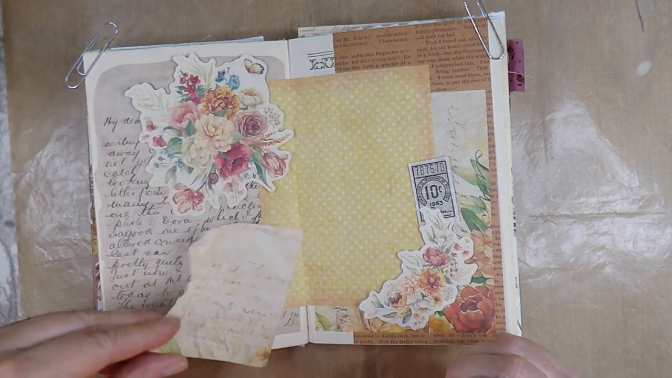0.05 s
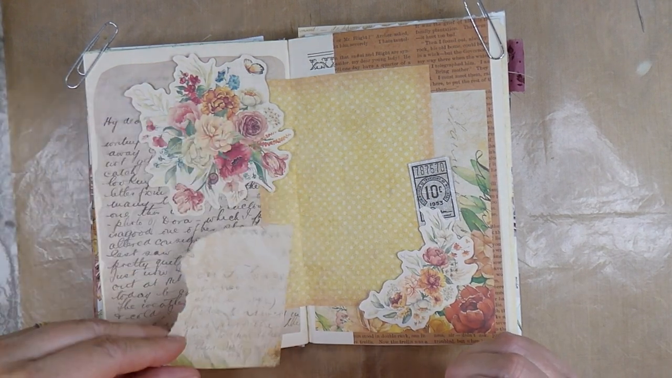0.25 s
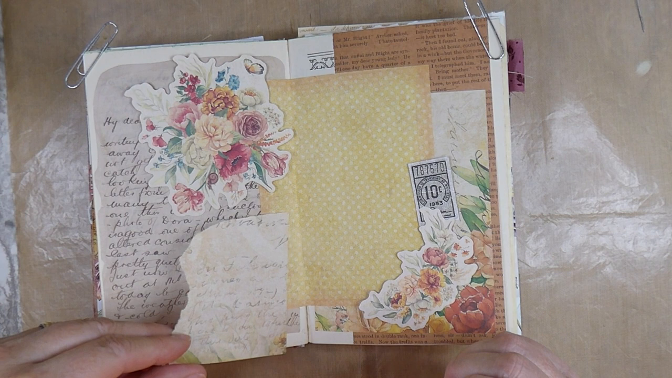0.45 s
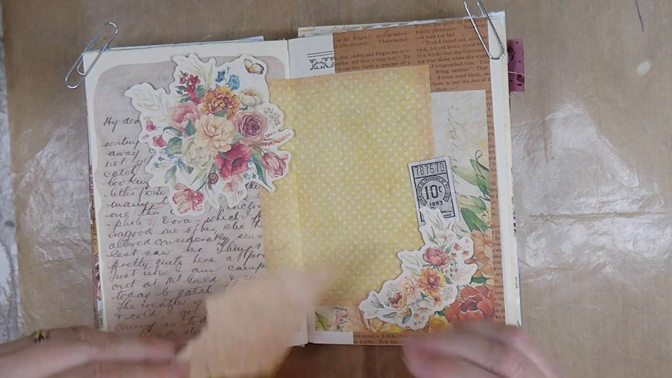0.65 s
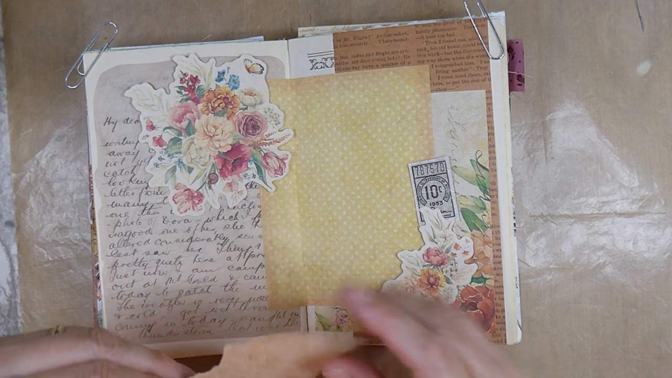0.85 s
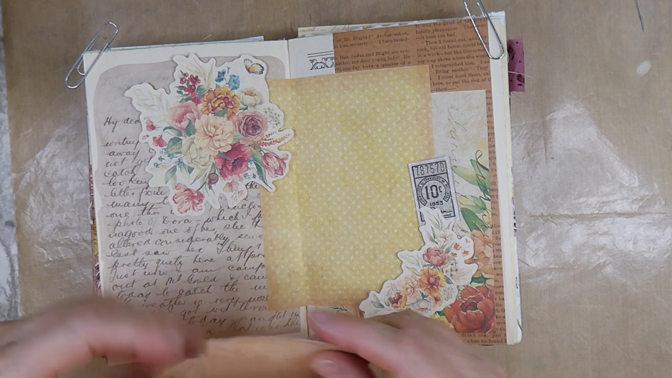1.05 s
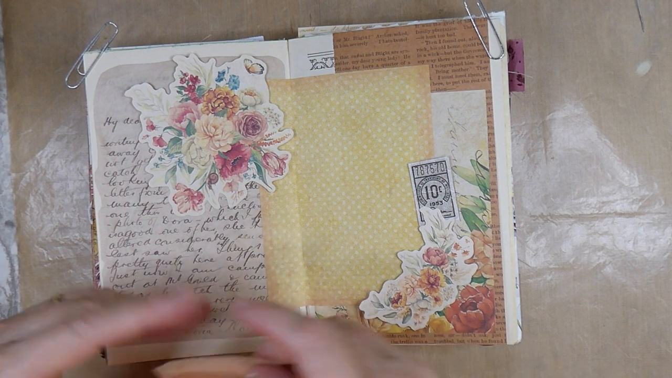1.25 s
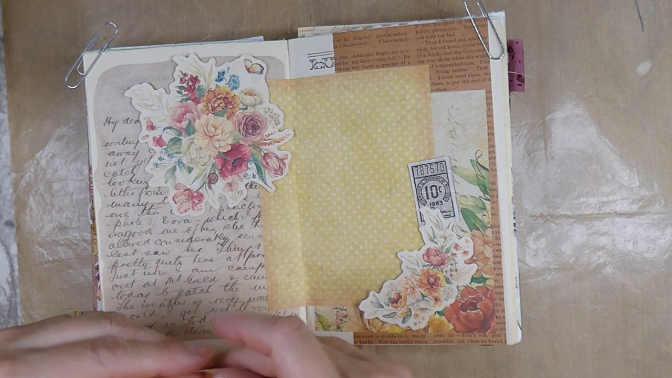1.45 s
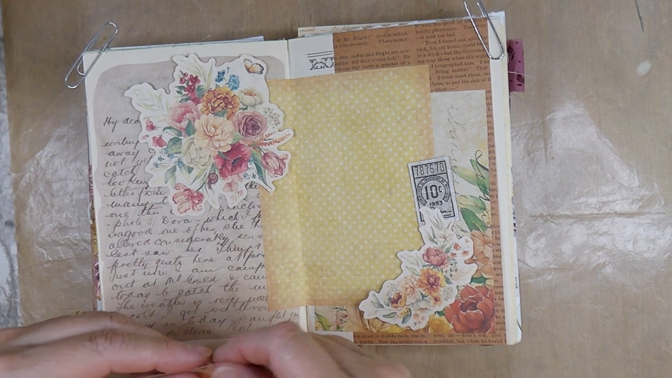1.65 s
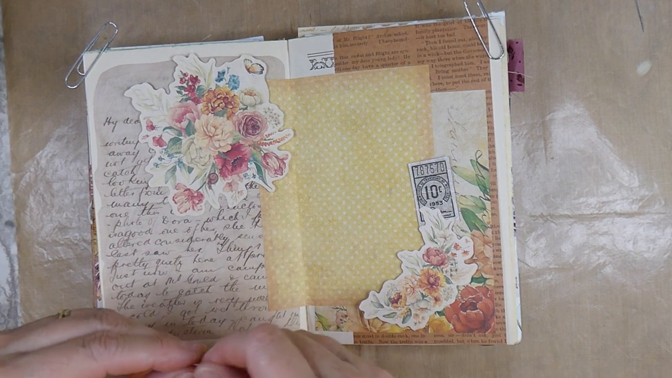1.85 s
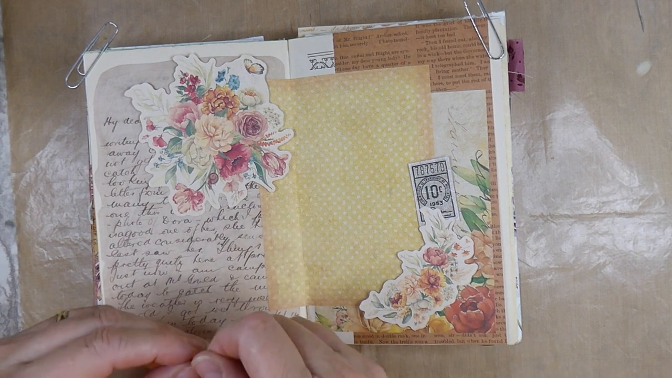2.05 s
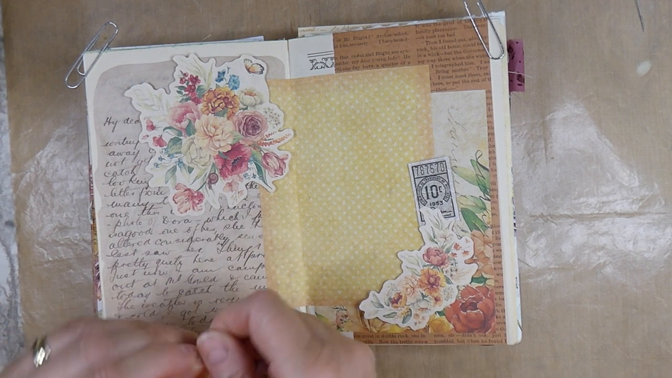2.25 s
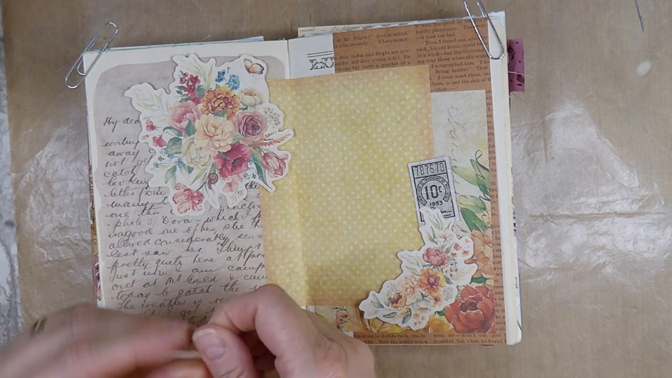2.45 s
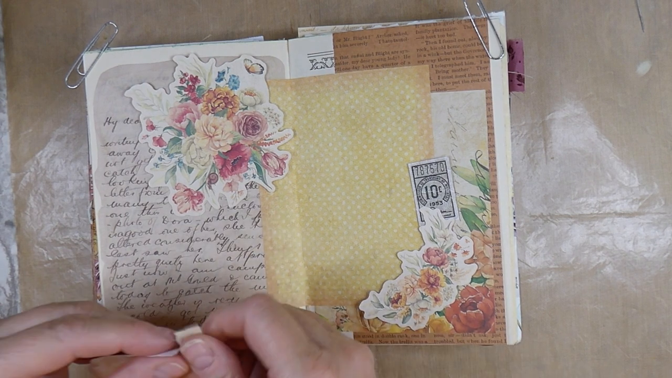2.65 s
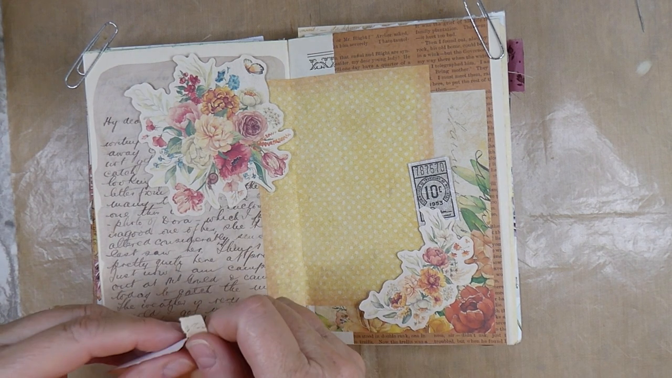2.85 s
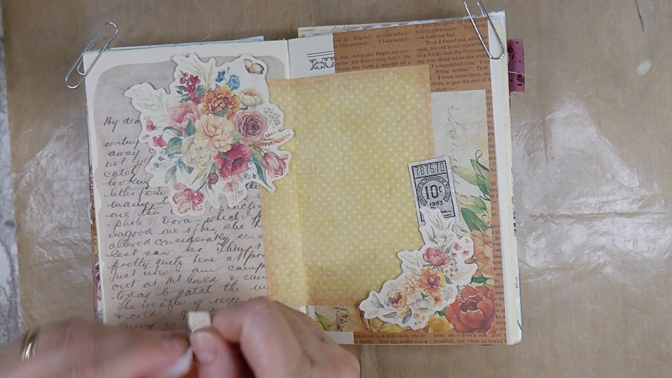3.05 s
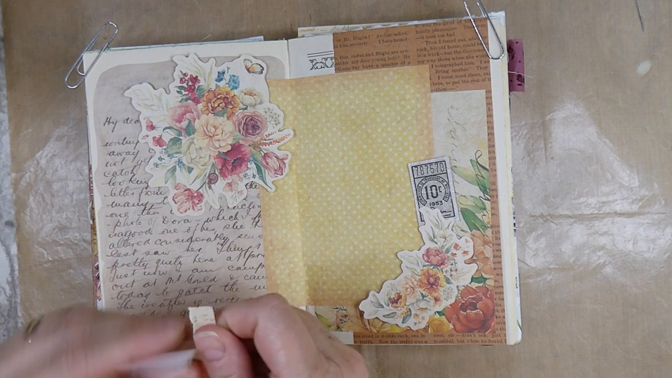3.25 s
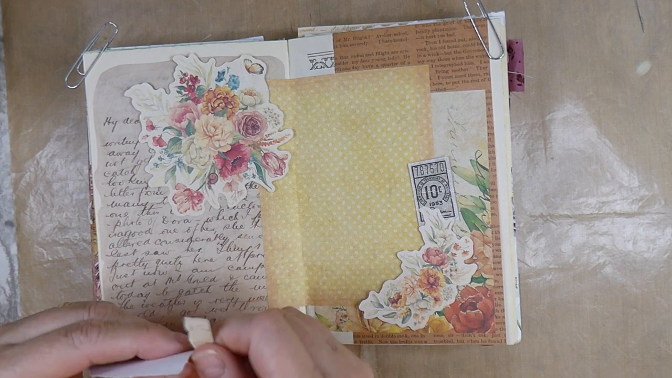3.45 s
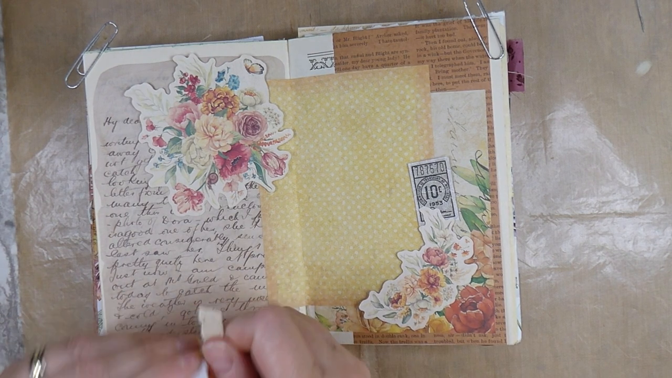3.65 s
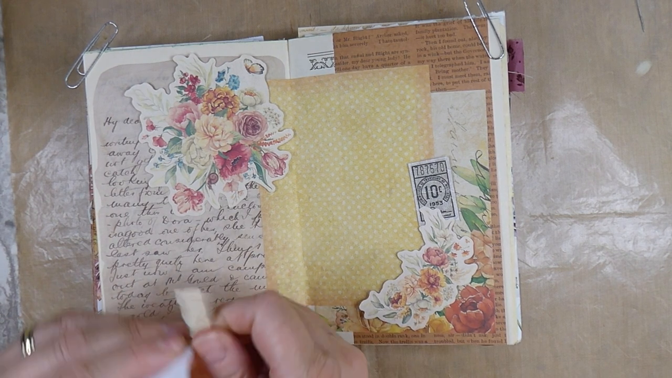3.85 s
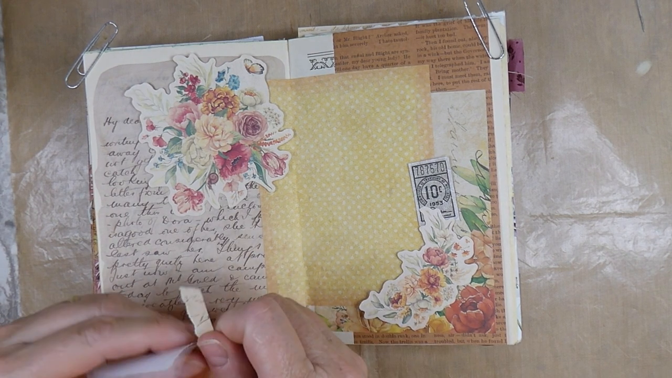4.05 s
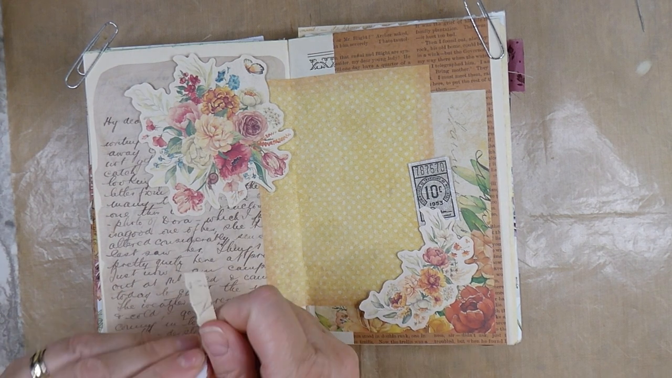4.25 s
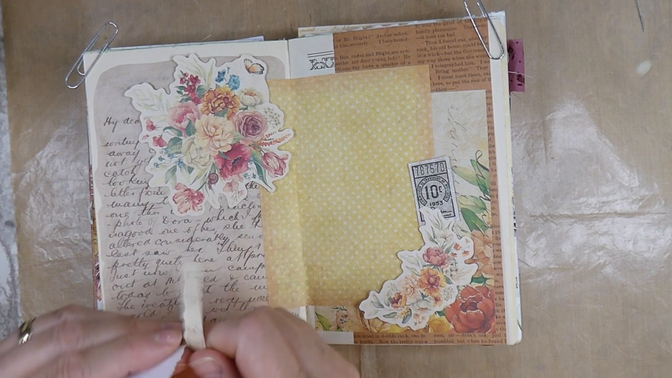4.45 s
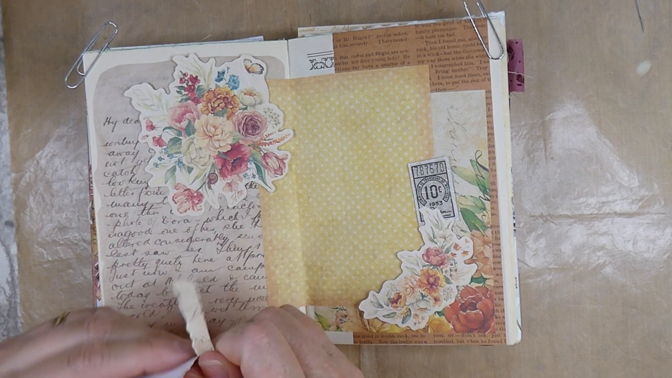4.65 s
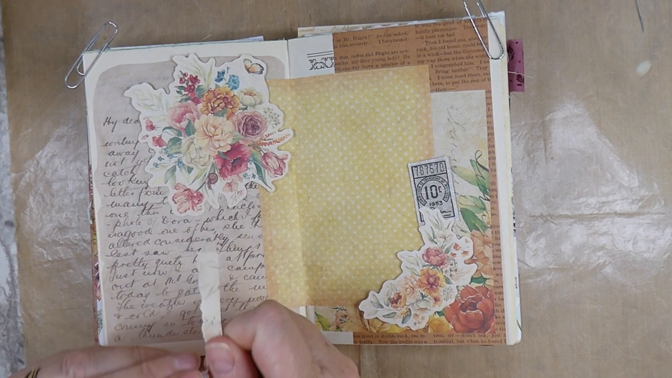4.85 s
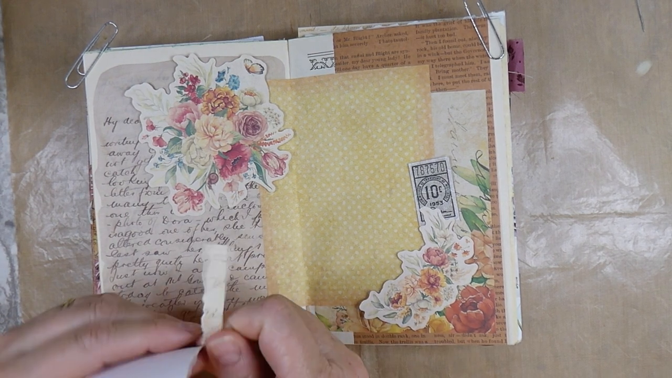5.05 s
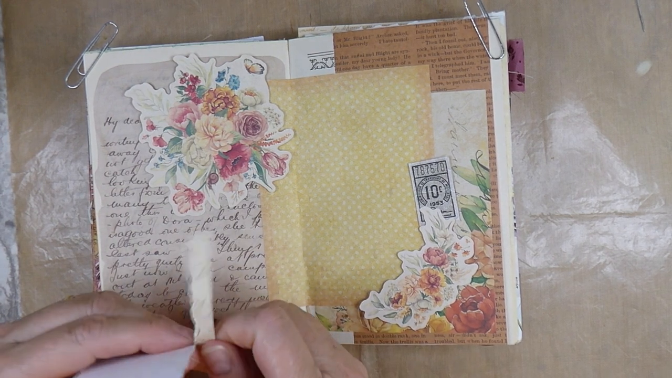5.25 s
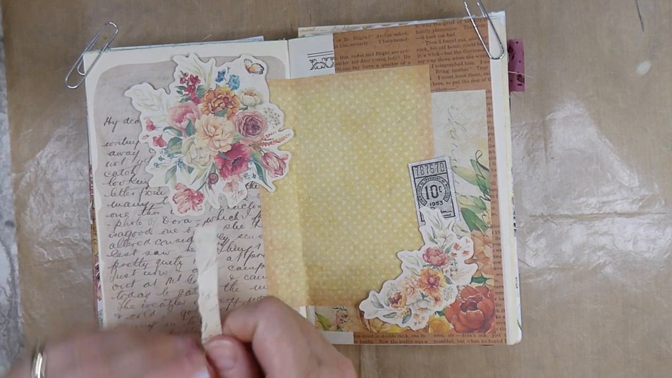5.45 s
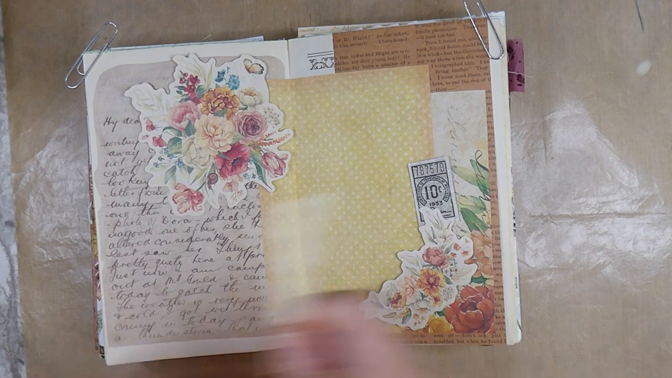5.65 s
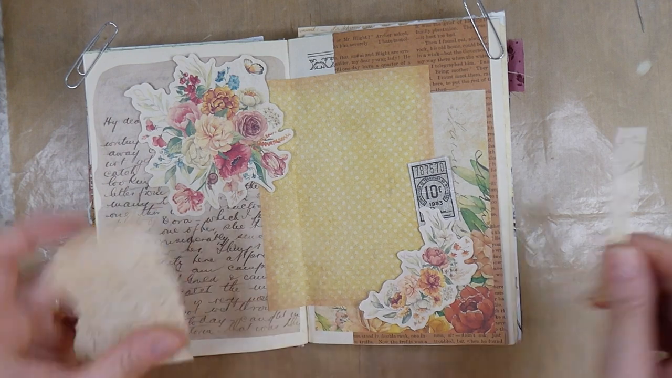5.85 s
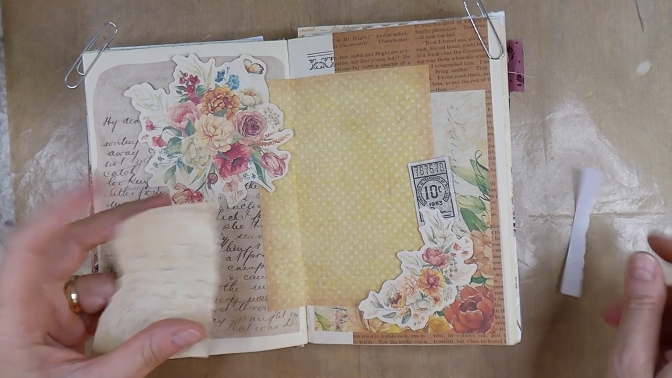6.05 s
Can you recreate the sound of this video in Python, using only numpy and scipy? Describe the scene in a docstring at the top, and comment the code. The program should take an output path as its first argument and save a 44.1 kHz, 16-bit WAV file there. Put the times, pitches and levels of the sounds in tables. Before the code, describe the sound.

Fingertips rustle a scrap of thin paper, then tear off a strip in short, crackling pulls in a quiet room.

```python
"""Fingertips rustle and slide on a scrap of thin paper; then a strip is torn off it in short pulls.
Breaking fibres crackle in showers of tiny bursts, sliding skin hisses, and both ring in the bending sheet.
Creases snap with a crack and a knock; a hand or the cupped sheet bumps softly.
The craft table and the walls return a short dull echo, and a quiet room hums below."""
import sys
import numpy as np
from scipy import signal
from scipy.fft import rfft, irfft
from scipy.io import wavfile
from scipy.ndimage import uniform_filter1d

SR = 44100
rng = np.random.default_rng(int(sys.argv[2]) if len(sys.argv) > 2 else 0)


def digitize_waveform(pressure):
    """Quantize a signal to 16-bit integers and store it at the path in sys.argv[1].

    Rows of a 2-D input are taken as channels; values are limited to [-1, 1].
    """
    field = np.atleast_2d(pressure).T
    bounded = np.clip(field, -1, 1)
    quanta = np.round(bounded * 32767).astype(np.int16)
    wavfile.write(sys.argv[1], SR, quanta)


N = 269892

# Hiss, flutter, boom: high, middle, low band of the sheet. Top: treble above TOP_HZ.
# Tearing pulls: (start [s], length [s], start hiss [dB], end hiss [dB], midway swell [dB],
# flutter [dB re hiss], start ring [Hz], end ring [Hz], boom [dB re hiss], torn share [0-1], top gain [dB])
PULLS = [(2.213, 0.11, -45, -59, 0.5, -4, 4600, 4720, -17.5, 1, -13),
         (2.324, 0.061, -49.5, -54, 6.5, -9.5, 4500, 4530, -20.5, 0.34, -7),
         (3.002, 0.17, -46.5, -55, 7.5, -3.5, 3470, 3930, -13.5, 0.52, 2.5),
         (3.66, 0.11, -42, -56, 2.5, -3.5, 4330, 4600, -16, 0.62, 2.5),
         (4.16, 0.13, -44.5, -54.5, 2, 0, 4600, 5200, -14.5, 0.58, 4),
         (4.741, 0.067, -39.5, -50, 4, -2.5, 4930, 5030, -13.5, 0.5, 5.5),
         (4.807, 0.068, -43.5, -42.5, 1, -3.5, 5400, 5480, -19.5, 0.57, -1.5),
         (5.417, 0.076, -46.5, -41, 0, -2, 4040, 4200, -15, 0.8, -18),
         (5.456, 0.12, -43.5, -35.5, 5.5, -3.5, 4330, 6200, -23, 0.48, -3.5),
         (5.571, 0.05, -38.5, -30.5, 0, -2, 3700, 4630, -16.5, 0.42, 6)]
# Fingertip slides: (peak time [s], hiss [dB], rise [s], fall [s], flutter [dB re hiss], ring [Hz],
# boom [dB re hiss])
SLIDES = [(0.345, -62.5, 0.054, 0.059, 0.5, 3800, -8), (0.592, -49.5, 0.061, 0.023, -1, 3000, -13),
          (1.071, -53.5, 0.07, 0.031, -4, 4400, -7.5), (1.116, -57, 0.026, 0.02, -2, 2720, 2.5),
          (1.43, -63, .2, 0.061, -5.5, 4500, -10), (1.54, -63.5, 0.16, 0.089, -8, 3800, -31),
          (1.698, -60.5, 0.08, 0.089, -6, 3970, -9), (2.468, -54, 0.071, 0.068, -7.5, 4870, -17),
          (2.552, -61.5, 0.04, 0.047, -6, 4300, -12), (2.62, -58, 0.021, 0.045, -7, 4200, -23),
          (2.715, -62, 0.11, 0.024, -7.5, 4300, -15), (2.85, -49.5, 0.1, 0.082, -8.5, 4770, -17),
          (3.258, -51, 0.058, 0.13, -6.5, 4180, -12), (3.416, -61.5, 0.037, 0.21, -4, 4030, -9),
          (3.879, -47, 0.024, 0.041, -8, 3200, -22), (3.642, -52.5, 0.03, 0.039, -2.5, 4300, -10),
          (4.049, -52.5, 0.081, 0.09, -4, 4830, -15), (4.394, -49.5, 0.013, 0.069, -6.5, 4470, -12.5),
          (4.49, -54, 0.049, 0.022, -5, 4330, -14), (4.58, -52, 0.055, 0.16, -5, 4270, -15),
          (4.705, -55, 0.015, 0.011, 12, 4530, 3), (4.977, -51.5, 0.031, 0.13, -2, 2930, -12.5),
          (5.078, -60, 0.034, 0.05, -13, 4030, -11), (5.146, -60.5, 0.065, 0.12, -4, 4770, -9.5),
          (5.752, -61, 0.068, 0.14, -4.5, 4570, -10.5), (5.885, -56.5, 0.017, 0.051, -3.5, 4600, -10),
          (6.035, -65, 0.088, 0.011, 4, 3440, 1)]
# Sheet merely held: (time [s], hiss [dB], flutter [dB re hiss], boom [dB re hiss])
HELD = [(0, -68.5, -1, -25), (0.25, -74, 3.5, -5), (0.5, -70.5, -2, -19), (0.68, -77.5, 0, -20),
        (1.0, -74, -3, -12), (1.2, -80, 7, 7), (1.85, -75.5, -15, -14), (2.12, -75.5, -5, -18),
        (2.19, -59.5, -2.5, -18), (2.55, -83, -8, 6), (2.95, -71, -2, -2), (3.56, -75, 5, 3),
        (3.82, -63, -4.5, -8), (4.33, -63, 1.5, -2.5), (4.7, -71.5, 0, 2), (5.28, -71, 1.5, -3.5),
        (6.12, -70, 2.5, -1)]
# Paper colour at the microphone: (frequency [Hz], gain [dB])
PAPER_SPECTRUM = [(180, -40), (400, -17.5), (800, -16.5), (1900, -12), (2600, -13.5), (4500, -5),
                  (5800, -7.5), (6900, -7), (8100, -7.5), (9700, 0), (11300, -5), (12800, -13.5),
                  (14700, -27.5), (16000, -13)]
# Resonances of the bending sheet: (centre [Hz], width [Hz], gain [dB])
FLEX_MODES = [(1710, 88, -7.5), (3440, 150, 3), (6430, 1500, 1.5), (11090, 400, -9.5)]
# Snapping creases and fibre bundles, levels before filtering:
# (time [s], crack [dB], middle [dB re crack], knock [dB re crack], knock pitch [Hz])
SNAPS = [(0.583, -35, -17, -12, 520), (1.031, -49.5, 7.5, 0, 1100), (1.091, -51, -10, 12.5, 1340),
         (1.111, -40.5, 3.5, -9, 1290), (2.205, -33, 0, -15, 1120), (2.266, -25.5, -20, -28, 1000),
         (2.615, -36, -13, -12, 1090), (2.73, -51.5, -8.5, 13, 1190), (2.783, -53, 5, 7, 1210),
         (2.917, -54, -13.5, 5.5, 1150), (2.994, -33, -1, -23, 1180), (3.0263, -26.5, -15, -18.5, 1300),
         (3.036, -17, -6, -28, 1160), (3.06, -33, -14, -30, 1100), (3.081, -18, -10, -43, 1060),
         (3.41, -24, 0, -19, 1220), (3.6557, -27, -2.5, -23, 627), (3.668, -23.5, -3, -26, 627),
         (3.866, -37.5, 14, 6, 960), (4.133, -31, -3, -40, 900), (4.1566, -18, -5.5, -21.5, 405),
         (4.168, -25, 12, -5, 1770), (4.195, -16.5, -5, -29, 900), (4.263, -21, -20, -34, 401),
         (4.284, -36, -7, -30, 900), (4.317, -15, 3, -16, 1500), (4.388, -32, -2, -15.5, 864),
         (4.419, -25, -17.5, -19, 825), (4.699, -31.5, 15.5, 1, 1270), (4.739, -14, -5, -25, 693),
         (4.781, -24, -3, -12.5, 770), (4.836, -20, -4.5, -24, 1170), (4.855, -20, -14, -25, 1180),
         (4.977, -45.5, 16, 4.5, 470), (5.073, -41, 3, -33, 856), (5.403, -35, 0, -21, 471),
         (5.422, -17.5, -13, -34, 1210), (5.432, -17.5, -23, -34, 571), (5.438, -14, -23.5, -31.5, 1210),
         (5.552, -13.5, -28, -36, 880), (5.606, -24, 9, -8.5, 2060), (5.621, -21, 0, -6.5, 1970),
         (5.63, -8, 0.5, -23, 760), (5.637, -28.5, 7, -12, 710), (6.066, -30.5, 5, -8, 2120)]
# Hollow bumps: (start [s], level [dB], pitch [Hz], width [Hz], length [s])
BUMPS = [(0.194, -66.5, 650, 300, 0.042), (0.331, -63, 450, 300, 0.034), (1.405, -60.5, 1070, 900, 0.043),
         (1.844, -60, 310, 220, 0.039), (2.592, -65, 1180, 600, 0.036), (2.821, -61, 1040, 895, 0.045),
         (3.674, -58.5, 570, 150, 0.042)]
# Position of the hands: (time [s], left over right [dB])
HAND_PAN = [(0, 0), (2, -0.5), (5.9, -0.5), (6.05, 4)]
# Room tone colour: (frequency [Hz], relative density [dB])
HUM_SPECTRUM = [(20, -11.5), (64, -14), (115, -3), (290, 2), (550, -1), (1000, 0), (2500, -10.5),
                (3800, -11), (5600, -18), (7500, -17.5), (10000, -18), (14500, -24), (16000, -26)]
# Room tone likeness, left to right: (frequency [Hz], correlation [-1 to 1])
HUM_CORRELATION = [(60, 0.46), (150, 0.7), (380, 0.29), (950, -0.79), (2400, -0.41), (6000, 0.18),
                   (15000, 0.49)]
# Room tone balance: (frequency [Hz], left over right [dB])
HUM_BALANCE = [(60, 0), (240, -6), (950, -2.5), (3770, 0), (15000, -1.5)]

LOW_HZ, HIGH_HZ, TOP_HZ, CUTOFF_HZ = 2500, 6000, 11400, 16500
PULL_ATTACK_DB_PER_S, PULL_RELEASE_DB_PER_S = 4000, 700
SLIDE_FADE_DB, SLIDE_FADE_POWER, SLIDE_TORN_SHARE, SLIDE_TOP_DB = 23, 1.6, 0.21, -1.5
HELD_RING_HZ, HELD_TORN_SHARE, HELD_TOP_DB = 3530, 0.22, -1.5
CRACKS_PER_S, CRACK_SPREAD_DB, CRACK_COLOUR_DB = 950, 3.3, 5
FLEX_SPREAD_OCTAVES, FLEX_DRIFT_HZ, RING_WIDTH_HZ = 0.15, 8.1, 1900
KNOCK_WIDTH_HZ, SNAP_TOP_DB = 480, -7.5
SCATTER_T60_S, SCATTER_DB = 0.022, -7
ROOM_T60_S, ROOM_DB, WALL_CUT_HZ, HUM_DB = 0.093, -8.5, 4440, -62


def tearing_and_rubbing():
    """Crackling fibres and smooth skin friction, mixed by the torn share, drive the sheet."""
    hiss_gain, flutter_db, ring_hz, boom_db, torn_share, top_db = handling()
    torn_share = np.clip(torn_share, 0, .8)
    fibres = fibre_cracks()
    skin = from_db(2.43 * drift(rate_hz=31.3)) * rng.standard_normal(N)
    drive = flexing(np.sqrt(torn_share) * fibres + np.sqrt(1 - torn_share) * skin)
    boom, middle, high = map(rms_one, three_bands(coloured(drive, PAPER_SPECTRUM)))
    ring = gliding(gliding(drive, ring_hz, RING_WIDTH_HZ), ring_hz, RING_WIDTH_HZ)
    flutter = rms_one(from_db(3 - 18 * torn_share) * middle + rms_one(ring))   # taut paper rings more
    return hiss_gain * (with_top(high, top_db) + from_db(flutter_db) * flutter + from_db(boom_db) * boom)


def handling():
    """Hold, pulls and slides add in power: hiss gain, then five power-weighted tone controls."""
    t = np.arange(N) / SR
    held_db, flutter_db, boom_db = over_time(HELD)
    moves = [(held_db, flutter_db, HELD_RING_HZ, boom_db, HELD_TORN_SHARE, HELD_TOP_DB)]
    for (start_s, length_s, start_db, end_db, swell_db, flutter_db,
         start_hz, end_hz, boom_db, torn_share, top_db) in PULLS:
        progress = np.clip((t - start_s) / length_s, 0, 1)
        hiss_db = start_db + (end_db - start_db) * progress + swell_db * np.sin(np.pi * progress)
        hiss_db -= PULL_ATTACK_DB_PER_S * np.maximum(start_s - t, 0)
        hiss_db -= PULL_RELEASE_DB_PER_S * np.maximum(t - start_s - length_s, 0)
        ring_hz = start_hz + (end_hz - start_hz) * progress
        moves.append((hiss_db, flutter_db, ring_hz, boom_db, torn_share, top_db))
    for peak_s, peak_db, rise_s, fall_s, flutter_db, ring_hz, boom_db in SLIDES:
        from_peak = np.maximum((peak_s - t) / rise_s, (t - peak_s) / fall_s)
        hiss_db = peak_db - SLIDE_FADE_DB * from_peak ** SLIDE_FADE_POWER
        moves.append((hiss_db, flutter_db, ring_hz, boom_db, SLIDE_TORN_SHARE, SLIDE_TOP_DB))
    levels_db, *controls = zip(*moves)
    powers = [from_db(2 * db) for db in levels_db]
    total = sum(powers)
    blended = [sum(power * value for power, value in zip(powers, control)) / total for control in controls]
    return np.sqrt(total), *blended


def fibre_cracks():
    """Fibres break in showers of millisecond bursts, each with its own size and colour."""
    breaks = rng.random(N) < CRACKS_PER_S * from_db(2 * drift(rate_hz=80)) / SR
    sizes = breaks * from_db(CRACK_SPREAD_DB * np.minimum(rng.exponential(1, N), 3.5))
    edges_hz, out = [200, LOW_HZ, HIGH_HZ, 8500, TOP_HZ, CUTOFF_HZ], np.zeros(N)
    for band_hz in zip(edges_hz, edges_hz[1:]):
        envelope = decays(sizes * from_db(CRACK_COLOUR_DB * rng.standard_normal(N)), t60_s=0.0036)
        envelope /= np.sqrt(uniform_filter1d(envelope ** 2, size=SR // 50) + .01)   # the pull feeds steadily
        out += butterworth(envelope * rng.standard_normal(N), band_hz, "band")
    return rms_one(out)


def flexing(drive):
    """The sheet's resonances wander in pitch as it bends."""
    modes = np.zeros(N)
    for centre_hz, width_hz, gain_db in FLEX_MODES:
        octaves = FLEX_SPREAD_OCTAVES * np.clip(drift(FLEX_DRIFT_HZ), -2, 2)
        modes += from_db(gain_db) * gliding(drive, centre_hz * 2 ** octaves, width_hz)
    return drive + modes


def snaps():
    """Each snap cracks and the fold knocks; thin fibres stop quickly, full creases ring a little longer, and
    every snap leaves a faint shiver."""
    time_s, crack_db, middle_db, knock_db, knock_hz = np.transpose(SNAPS)
    onsets = np.round(time_s * SR).astype(int)
    noise = rng.standard_normal(N)
    cracks, crease_share = np.zeros((2, N))
    crease_share[onsets] = np.clip(1 + middle_db / 8, 0, 1)
    for band, band_db, crease_t60_s in [(1, middle_db, 0.013), (2, 0, 0.011)]:   # middle, high
        clicks = np.zeros(N)
        clicks[onsets] = from_db(crack_db + band_db)
        crease = decays(clicks * crease_share, crease_t60_s)
        fibre = decays(clicks * (1 - crease_share), t60_s=0.0056)
        shiver = from_db(-21) * decays(clicks, t60_s=0.16)
        cracks += three_bands(noise * (crease + fibre + shiver))[band]
    cracks = with_top(coloured(cracks, PAPER_SPECTRUM), SNAP_TOP_DB)
    return cracks + fold_knocks(noise, onsets, crack_db + knock_db, knock_hz)


def fold_knocks(noise, onsets, levels_db, pitches_hz):
    """Each fold knocks at its own pitch: a dull burst plus a hollow resonance."""
    dull = rms_one(three_bands(coloured(noise, PAPER_SPECTRUM))[0])
    t = np.arange(SR // 10) / SR
    attack = 1 - np.exp(-t / 0.0017)   # soft fingertips
    envelope = attack * (from_db(-60 * t / 0.014) + 0.1 * from_db(-60 * t / 0.06))
    out = np.zeros(N)
    for onset, level_db, pitch_hz in zip(onsets, levels_db, pitches_hz):
        span, shape = slice(onset, onset + len(t)), envelope[:N - onset]
        hollow = signal.lfilter(*resonance(pitch_hz, KNOCK_WIDTH_HZ), noise[span] * shape)
        out[span] += from_db(level_db) * (0.5 * dull[span] * shape + 4.9 * hollow)
    return butterworth(out, [220, 3500], "band")   # a small scrap moves no bass


def bumps():
    """A hand or the cupped sheet bumps: a puff swells and fades through a hollow resonance."""
    out = np.zeros(N)
    for start_s, level_db, pitch_hz, width_hz, length_s in BUMPS:
        t = np.arange(int(length_s * SR)) / SR
        puff = rng.standard_normal(SR // 5)
        for _ in range(2):
            puff = signal.lfilter(*resonance(pitch_hz, width_hz), puff)
        envelope = from_db(level_db) * np.sin(np.pi * t / length_s)
        out[int(start_s * SR):][:len(t)] += envelope * rms_one(puff[-len(t):])
    return out


def scatter(x):
    """The shortest waves bend round the microphone body and reach the two capsules unlike."""
    t = np.arange(SR // 50) / SR
    smear = rms_one(rng.standard_normal(len(t)) * from_db(-60 * t / SCATTER_T60_S)) / np.sqrt(len(t))
    top = butterworth(x, TOP_HZ, "high", order=6)
    return from_db(SCATTER_DB) * signal.fftconvolve(top, smear)[:N] * [[1], [-1]]


def room_echo(x):
    """Table and walls return a short dull tail, different on each side."""
    t = np.arange(SR // 3) / SR
    tail = rng.standard_normal((2, len(t))) * from_db(-60 * t / ROOM_T60_S) * (t > .002)
    tail = butterworth(tail, WALL_CUT_HZ, "low")
    tail /= np.sqrt(np.sum(tail ** 2, axis=1, keepdims=True))
    return from_db(ROOM_DB) * signal.fftconvolve(x[None], tail, axes=1)[:, :N]


def room_hum():
    """Steady noise of the room; stereo correlation and balance vary with frequency."""
    hz = np.fft.rfftfreq(N, 1 / SR)
    mid, side = rfft(rng.standard_normal((2, N)))
    correlation = at_hz(HUM_CORRELATION, hz)
    pair = np.sqrt(1 + correlation) * mid + np.sqrt(1 - correlation) * side * [[1], [-1]]
    gain = from_db(at_hz(HUM_SPECTRUM, hz) + at_hz(HUM_BALANCE, hz) * [[.5], [-.5]])
    return from_db(HUM_DB) * rms_one(irfft(pair * gain, N))


def from_db(db):
    """Decibels to amplitude gain."""
    return 10 ** (np.asarray(db) / 20)


def rms_one(x):
    """Scale to rms 1."""
    return x / np.sqrt(np.mean(x ** 2) + 1e-20)


def at_hz(table, hz):
    """Interpolate a table over log frequency."""
    points_hz, values = np.transpose(table)
    return np.interp(np.log(hz + 1), np.log(points_hz), values)


def over_time(table):
    """Interpolate each value column, one value a sample."""
    time_s, *columns = np.transpose(table)
    return [np.interp(np.arange(N) / SR, time_s, column) for column in columns]


def coloured(x, spectrum):
    """Minimum-phase filter from the folded cepstrum of a spectrum table."""
    gain = from_db(at_hz(spectrum, np.linspace(0, SR / 2, 2049)))
    cepstrum = irfft(np.log(gain))
    cepstrum[1:2048] *= 2
    cepstrum[2049:] = 0
    return signal.fftconvolve(x, irfft(np.exp(rfft(cepstrum))))[:N]


def butterworth(x, hz, kind, order=2):
    """Causal low-, high- or band-pass."""
    return signal.sosfilt(signal.butter(order, hz, kind, fs=SR, output="sos"), x)


def three_bands(x):
    """Split into low, middle, high."""
    bands = [(LOW_HZ, "low"), ([LOW_HZ, HIGH_HZ], "band"), (HIGH_HZ, "high")]
    return [butterworth(x, hz, kind, order=3) for hz, kind in bands]


def with_top(x, top_db):
    """Raise or lower the treble above TOP_HZ."""
    top = butterworth(x, TOP_HZ, "high", order=3)
    return butterworth(x, TOP_HZ, "low", order=3) + from_db(top_db) * top


def resonance(hz, width_hz):
    """Coefficients of a unity-gain peak."""
    r = np.exp(-np.pi * width_hz / SR)
    return [(1 - r * r) / 2, 0, (r * r - 1) / 2], [1, -2 * r * np.cos(2 * np.pi * hz / SR), r * r]


def gliding(x, hz, width_hz, block=256):
    """Resonance with a moving centre, stepped per block."""
    out, state = np.zeros(N), np.zeros(2)
    for i in range(0, N, block):
        out[i:i + block], state = signal.lfilter(*resonance(hz[i], width_hz), x[i:i + block], zi=state)
    return out


def decays(clicks, t60_s):
    """Envelope: fast rise and exponential fall per click."""
    pole = from_db(-60 / (t60_s * SR))
    falling = signal.lfilter([1], [1, -pole], clicks + 1e-18)
    return signal.lfilter([.25], [1, -.75], falling)


def drift(rate_hz):
    """Slow random curve, rms 1."""
    r = np.exp(-2 * np.pi * rate_hz / SR)
    return rms_one(signal.lfilter([1], [1, -2 * r, r * r], rng.standard_normal(N + SR))[SR:])


def scene():
    """Close paper panned with the hands, plus scatter, echo and room tone."""
    paper = tearing_and_rubbing() + snaps() + bumps()
    pan_db, = over_time(HAND_PAN)
    direct = paper * from_db(pan_db * [[.5], [-.5]])
    return direct + scatter(paper) + room_echo(paper) + room_hum()


def record(dry):
    """Steep low-pass, 70 dB down from CUTOFF_HZ."""
    return signal.sosfilt(signal.cheby2(12, 70, CUTOFF_HZ, fs=SR, output="sos"), dry)


dry = scene()
out = record(dry)
digitize_waveform(out)
```